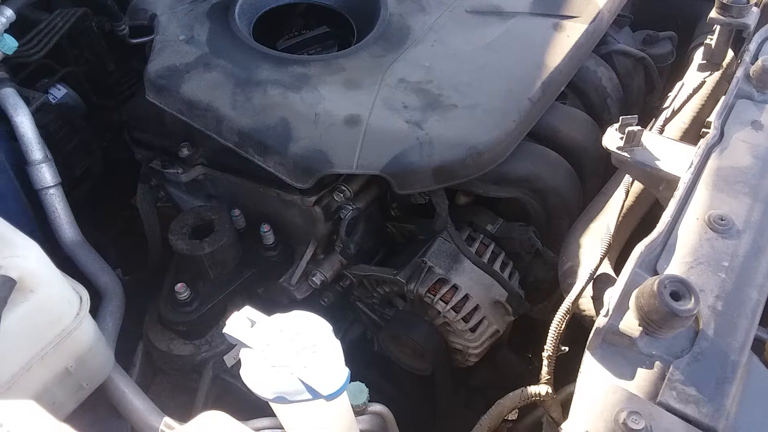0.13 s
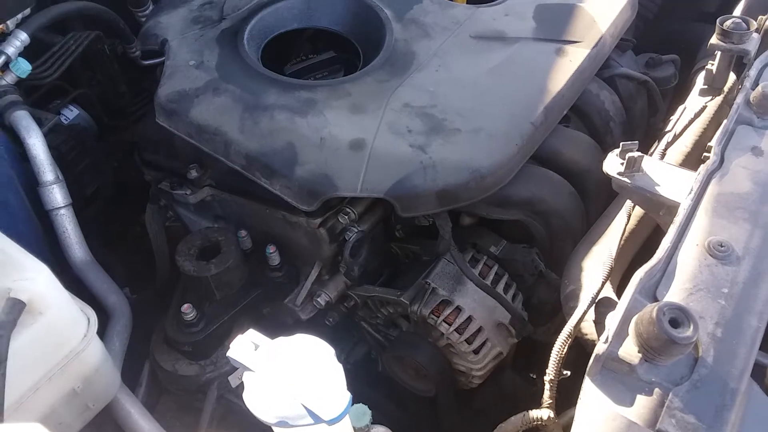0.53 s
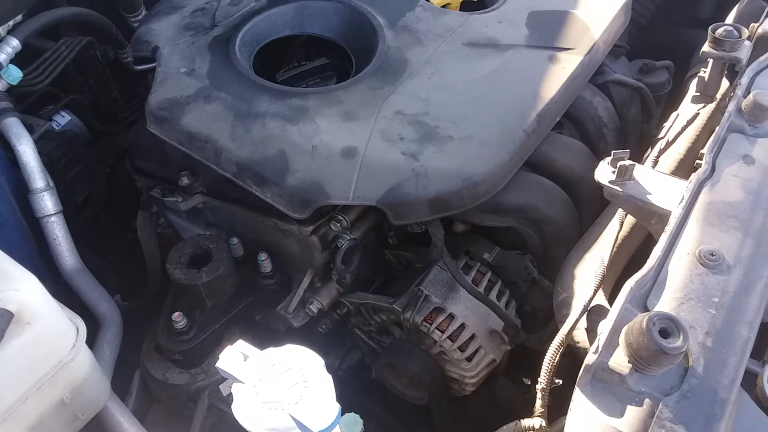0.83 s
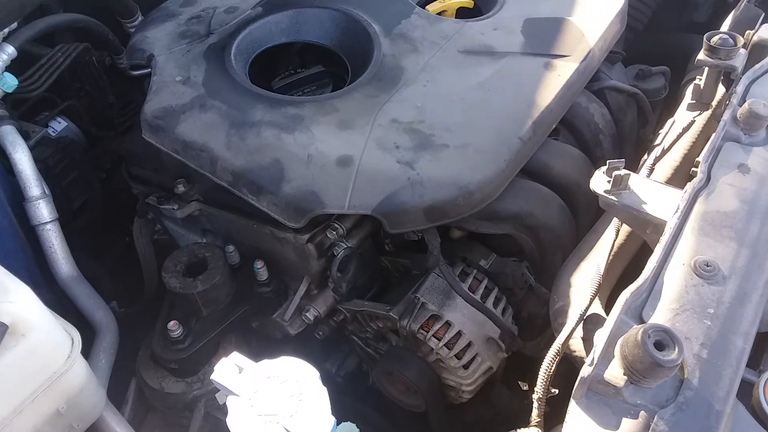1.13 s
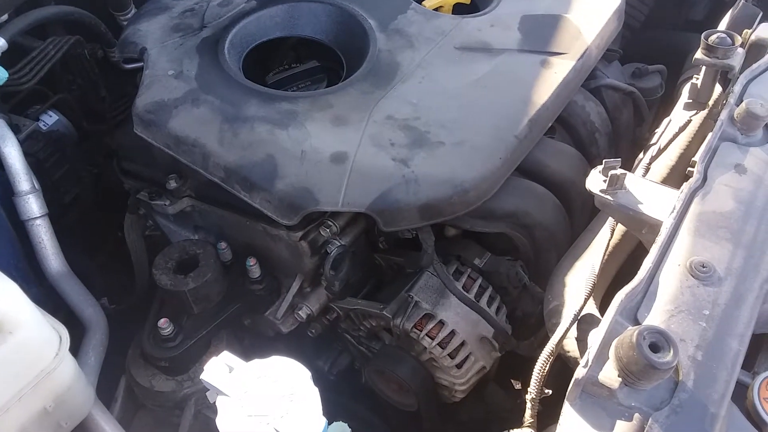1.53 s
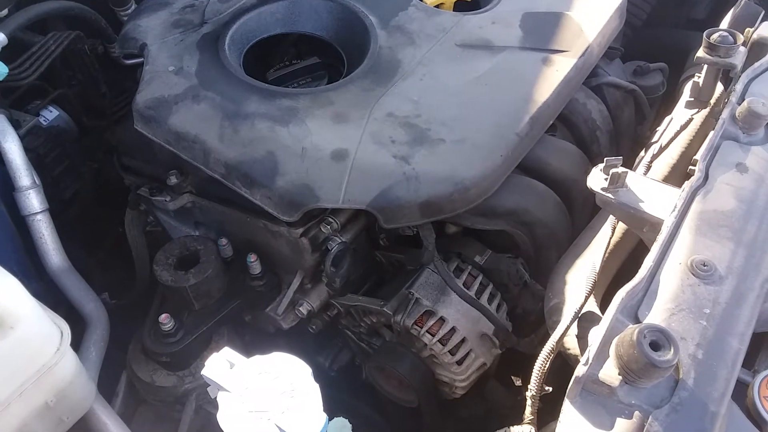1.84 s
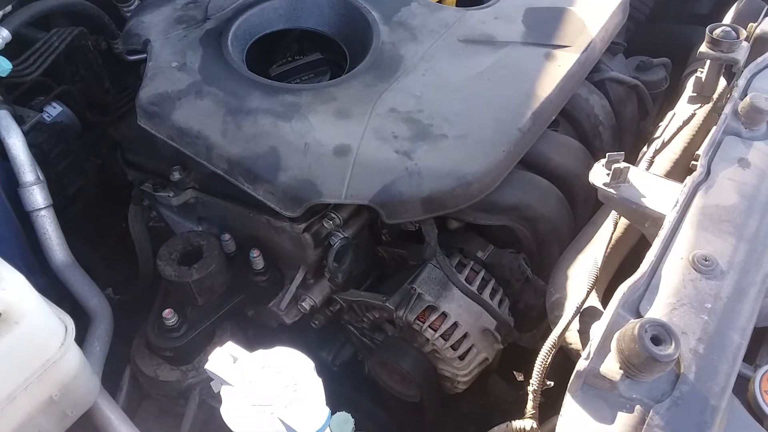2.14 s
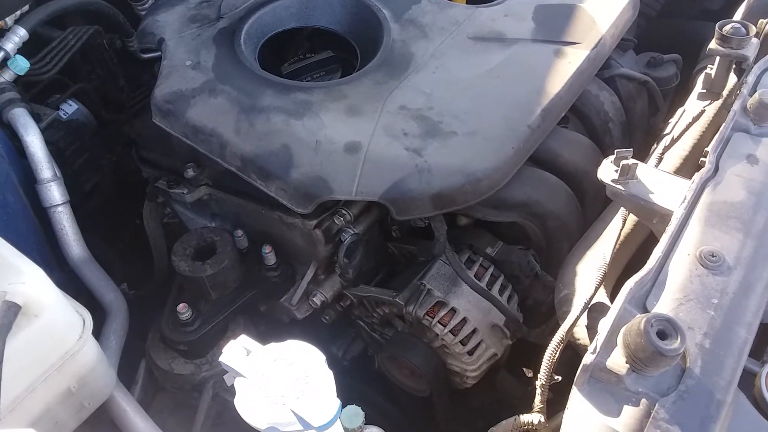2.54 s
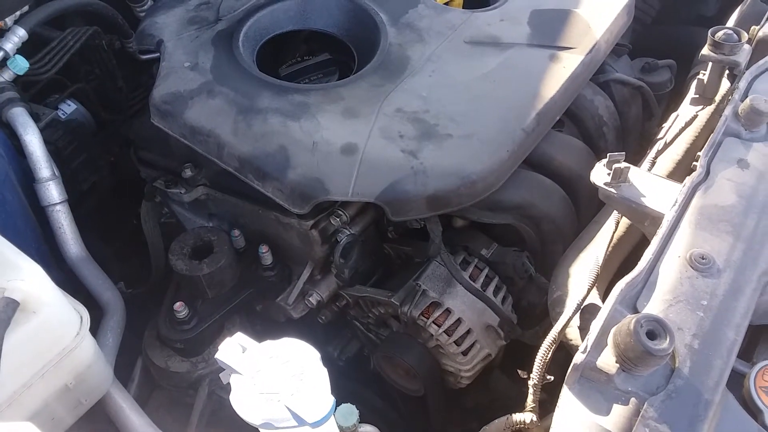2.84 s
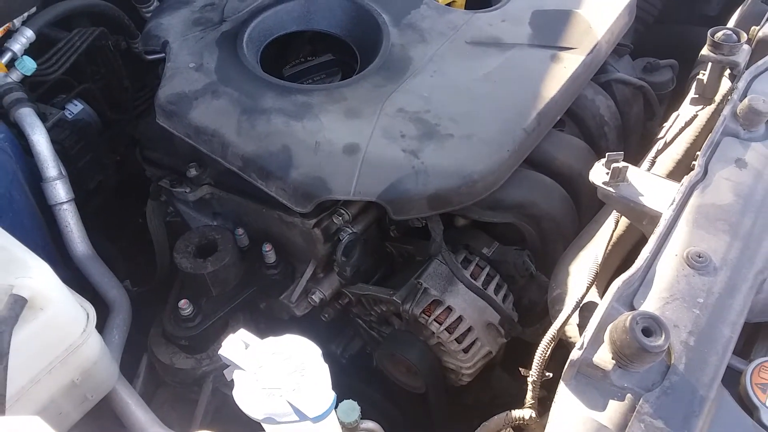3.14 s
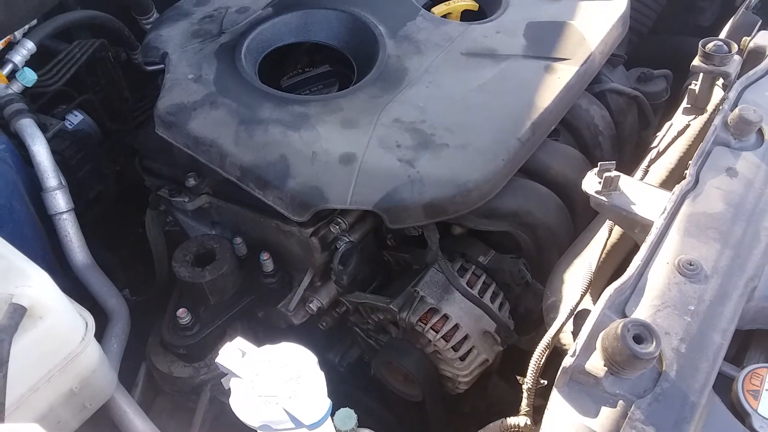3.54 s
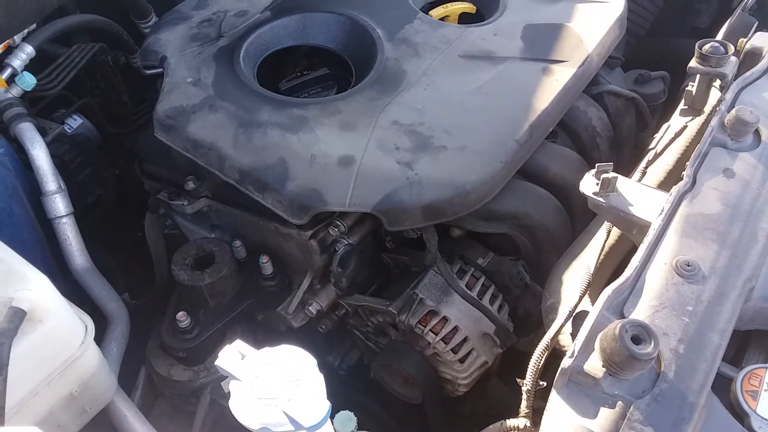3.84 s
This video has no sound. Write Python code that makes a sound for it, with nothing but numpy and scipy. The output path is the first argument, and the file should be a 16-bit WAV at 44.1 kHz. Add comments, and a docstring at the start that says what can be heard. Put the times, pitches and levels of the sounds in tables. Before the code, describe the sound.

After a short silence, a car engine fades in quickly and idles roughly, with fast, uneven hard knocks and bright rattles over hum and rumble, heard in stereo from just above the open bay outdoors.

```python
"""After a brief silence a four-cylinder engine fades in, idling with the bonnet open, from just above the bay.
Most firings knock in the block: impulses ring its damped modes and throw noise, a crack and a bright rattle.
Beneath them lie a hum, sines on multiples of twice the firing rate, and a rumble of coloured noise.
Two low thumps, decaying sines, come early on."""
import sys
import numpy as np
from scipy import signal
from scipy.fft import rfft, irfft
from scipy.io import wavfile

SR = 44100
rng = np.random.default_rng(int(sys.argv[2]) if len(sys.argv) > 2 else 0)


def persist_wave(psi):
    """Save psi, clipped to +-1, as 16-bit WAV."""
    counts = np.round(np.clip(psi, -1, 1) * 32767).astype(np.int16)
    wavfile.write(sys.argv[1], SR, np.atleast_2d(counts).T)


def volts_from_decibels(level):
    """Turn decibel levels (scalar or array-like) into linear amplitude factors."""
    exponent = np.asarray(level, float) / 20
    return 10 ** exponent


N = 176400

# Hum fundamental, twice the firing rate. Each row: time in seconds, frequency in Hz.
HUM_SPEED = [(.5, 63.75), (1.6, 65.37), (2.75, 66.36), (4, 66.8)]
# Fade-in of hum, rumble and faint knocks. Each row: time in seconds, gain in dB.
FADE_IN = [(.404, -62), (.412, -19), (.47, -7.5), (.62, 3.5), (.72, 5.5)]
SWELL_S = 0.0007   # rounding of each onset
LEFT_RIGHT = np.array([[1], [-1]])


def rms_one(x):
    """Normalisation: dividing by the root mean square gives unit power."""
    return x / np.sqrt(np.mean(x ** 2) + 1e-20)


def in_time(rows):
    """Linear interpolation of a (seconds, value) table at every sample."""
    return np.interp(np.arange(N) / SR, *np.transpose(rows))


def at_hz(points, hz):
    """Interpolation of a (Hz, value) table on a logarithmic frequency axis."""
    table_hz, values = np.transpose(points)
    return np.interp(np.log(hz), np.log(table_hz), values)


def drift(rate_hz):
    """Low-passed noise: two equal poles turn white noise into a slow random course of rms 1."""
    step = 40   # samples between computed points
    pole = np.exp(-2 * np.pi * step * rate_hz / SR)
    white = rng.standard_normal(N // step + 2002)
    slow = signal.lfilter([1], [1, -2 * pole, pole ** 2], white)[2000:]   # settled part
    return np.interp(np.arange(N) / step, np.arange(len(slow)), rms_one(slow))


def stereo_noise(spectrum, rings=(), more_alike=0):
    """Interaural coherence: a shared and an opposed noise mix to a set likeness in each band; rms 1."""
    # Each row: frequency in Hz, left-right correlation.
    likeness = [(60, 1), (400, 1), (900, 0.083), (2500, 0.81), (4500, 0.033), (15000, 0.12)]
    # Each row: frequency in Hz, left minus right in dB.
    leftness = [(60, 18.5), (290, -3), (640, -2), (1410, 8), (3100, -11), (6820, 3), (15000, 11)]
    cutoff_hz = 15890
    hz = np.maximum(np.arange(N // 2 + 1) * SR / N, 1)
    mid, side = rfft(rng.standard_normal((2, N)))
    alike = np.clip(at_hz(likeness, hz) + more_alike, 0, 1)
    gain = volts_from_decibels(at_hz(spectrum, hz))
    for ring_hz, width_hz, db in rings:
        gain = gain + volts_from_decibels(db) / (1 + (2 * (hz - ring_hz) / width_hz) ** 2)
    pan = (hz < cutoff_hz) * volts_from_decibels(at_hz(leftness, hz) / 2 * LEFT_RIGHT)
    both = np.sqrt(1 + alike) * mid + np.sqrt(1 - alike) * side * LEFT_RIGHT
    return rms_one(irfft(gain * pan * both, N))


def dying(s, db, t60_s):
    """Exponential decay: powers of overlapping blows add, each with a rounded onset."""
    blows = np.zeros(N)
    np.add.at(blows, (s * SR).astype(int), volts_from_decibels(2 * db))
    decay = volts_from_decibels(-120 / (t60_s * SR))   # of power
    soft = np.exp(-2 / (SWELL_S * SR))
    power = signal.lfilter([1], [1, -decay], blows + 1e-18)
    return np.sqrt(signal.lfilter([1 - soft], [1, -soft], power))


def firings():
    """Firing order: counting cycles between knocks places every firing; unlisted ones knock faintly."""
    # Knocks, fade included. Each row: time in seconds, knock level in dB.
    knocks = [(0.432, -23.5), (0.4955, -14.5), (0.5588, -11), (0.6206, -4.5), (0.6528, -7), (0.7469, -2),
              (0.7784, -4), (0.8083, -5.5), (0.8714, -2.5), (0.9036, -3), (0.994, -4.5), (1.028, -4),
              (1.0893, -7), (1.1203, -3), (1.1518, -7.5), (1.1821, -5), (1.243, -4), (1.367, -3.5),
              (1.3987, -3.5), (1.4585, -8), (1.4884, -3.5), (1.5499, -4.5), (1.5826, -5.5), (1.673, -2.5),
              (1.7058, -6), (1.7663, -7), (1.7965, -2.5), (1.8282, -3), (1.859, -14), (1.888, -11.5),
              (1.9178, -3), (1.9504, -7), (2.0387, -3.5), (2.0721, -7.5), (2.1016, -5.5), (2.1619, -2.5),
              (2.1938, -3), (2.2834, -3.5), (2.3136, -7.5), (2.345, -7), (2.4045, -2.5), (2.4368, -7),
              (2.4976, -14), (2.5257, -2.5), (2.557, -5), (2.6163, -9), (2.6463, -5), (2.6787, -4.5),
              (2.708, -7.5), (2.739, -10), (2.767, -3), (2.7981, -5.5), (2.8875, -3.5), (2.9177, -7.5),
              (2.9479, -4), (2.979, -5), (3.008, -10), (3.0384, -9), (3.0677, -5.5), (3.1285, -4.5),
              (3.157, -7), (3.1889, -4.5), (3.219, -8), (3.2489, -4.5), (3.3085, -5.5), (3.3369, -4.5),
              (3.3973, -7), (3.4265, -3.5), (3.4577, -4), (3.5175, -7.5), (3.5476, -4), (3.5767, -6.5),
              (3.638, -9), (3.6656, -4), (3.6979, -4.5), (3.7575, -10), (3.7875, -3.5), (3.8176, -5.5),
              (3.9051, -3), (3.9368, -5)]
    odd_at_s = 0.62   # an odd firing knocks here
    faint_db, faint_spread_db = -13, 2.0
    quiet_from_s, quiet_db = 1.6, -8   # the faint knocks weaken from here
    s, db = np.transpose(knocks)
    rate_hz = np.interp(s, *np.transpose(HUM_SPEED)) / 2
    count = np.cumsum(np.round(np.diff(s, prepend=s[0]) * rate_hz)).astype(int)
    every = np.arange(count[-1] + 3)
    beyond = np.maximum(every - count[-1], 0)   # firings after the last listed knock
    all_s = np.interp(every, count, s) + beyond * 2 / HUM_SPEED[-1][1]
    from_odd = every - count[np.argmin(abs(s - odd_at_s))]
    all_db = faint_db + faint_spread_db * rng.standard_normal(len(every))
    all_db += np.interp(all_s, *np.transpose(FADE_IN))
    all_db += quiet_db * (all_s > quiet_from_s)
    all_db[count] = db
    return all_s - SWELL_S, all_db, from_odd % 2


def block(s, db, even):
    """Modal synthesis: impulses excite damped modes, odd and even firings in different proportions."""
    # Modes of the block. Each row: frequency in Hz, decay time t60 in seconds, level from odd firings
    # and from even firings in dB re the knock, left minus right in dB.
    modes = [(989.3, 0.084, -18.5, -20, 6), (1131, 0.065, -20.5, -25, 12.5), (1314, 0.077, -8, -13, 1.5),
             (1563, 0.097, -35, -18.5, -1), (1638.5, 0.053, -10.5, -14.5, 4.5),
             (1685, 0.13, -19.5, -21, 12), (2033, 0.073, -25.5, -18, 23.5), (2115, 0.13, -21.5, -13, -9),
             (2205, 0.04, -13.5, -10, 17.5), (2525, 0.042, -23, -19, 25.5), (2943, 0.066, -45, -10, 11.5),
             (3422, .035, -17.5, -11.5, 5)]
    mode_spread_db, ear_spread_db, phase_spread_rad = 2.0, 1.0, 0.5
    detune = 0.015   # spread of a mode's pitch from knock to knock, as a share
    rebound_s, rebound_odd_db, rebound_even_db = 0.011, -4, -5   # the low modes are struck again
    rebound_under_hz = 1800
    chance = rng.standard_normal((len(s), len(modes), 5))
    at = (s * SR).astype(int)
    again = np.minimum((s + rebound_s) * SR, N - 1).astype(int)
    latest = np.maximum(np.searchsorted(at, np.arange(N), "right") - 1, 0)   # knock now sounding
    rebound_gain = volts_from_decibels(np.where(even, rebound_even_db, rebound_odd_db))
    soft = np.exp(-1 / (SWELL_S * SR))
    out = np.zeros((2, N))
    for k, (hz, t60_s, odd_db, even_db, left_db) in enumerate(modes):
        blows = np.zeros((2, N), complex)
        level_db = db + np.where(even, even_db, odd_db) + mode_spread_db * chance[:, k, 0]
        phase = np.exp(1j * phase_spread_rad * chance[:, k, 3])
        rebound = (hz < rebound_under_hz) * rebound_gain * np.exp(1j * chance[:, k, 3])
        for ear in range(2):
            blow = volts_from_decibels(level_db + ear_spread_db * chance[:, k, 1 + ear]) * phase
            blows[ear, at] += blow
            blows[ear, again] += blow * rebound
        mode_hz = hz * (1 + detune * chance[latest, k, -1])
        spin = np.exp(2j * np.pi * np.cumsum(mode_hz) / SR)
        poles = np.convolve([1, -volts_from_decibels(-60 / (t60_s * SR))], [1, -soft])
        # the envelope is filtered at rest, then spun back up to the mode's pitch
        ring = signal.lfilter([1 - soft], poles, blows / spin + 1e-18) * spin
        out += ring.imag * volts_from_decibels(left_db / 2 * LEFT_RIGHT)
    return out


def bursts(s, db, even):
    """Noise bursts: knocks gate a broad crack and a treble rattle, a snap on a longer tail."""
    # The clearest treble rattles. Each row: time in seconds, rattle level in dB.
    rattles = [(0.494, -35), (0.619, -26), (0.7446, -22.5), (0.8693, -26), (0.934, -25), (1.1186, -25),
               (1.2733, -26), (1.3654, -27.5), (1.518, -24), (1.7947, -23), (1.9166, -25), (2.0397, -30),
               (2.07, -28), (2.2835, -29), (2.313, -24), (2.887, -29), (2.916, -24), (2.976, -25),
               (3.006, -48), (3.1262, -29), (3.186, -28.5), (3.2464, -28), (3.306, -30), (3.4262, -24),
               (3.575, -28), (3.696, -31), (3.665, -25), (3.7847, -34), (3.815, -30.5), (3.904, -27),
               (3.935, -31)]
    # Spectrum of the crack. Each row: frequency in Hz, relative density in dB per Hz.
    crack_spectrum = [(500, -26), (900, -6.5), (2100, 1), (3300, -12.5), (5500, -18.5), (8000, -103)]
    # Spectrum of the rattle. Each row: frequency in Hz, relative density in dB per Hz.
    rattle_spectrum = [(2350, -59), (4000, -8), (5670, -0.5), (7600, 2.5), (8520, -9), (12200, -10),
                       (15700, -14.5)]
    # Resonance of the rattle. Each row: frequency in Hz, width in Hz, relative level in dB.
    rattle_rings = [(6920, 180, 1.5)]
    odd_rattle_db, even_rattle_db = -23, -48   # every knock rattles a little, re its level
    crack_db, crack_t60_s = -9, 0.08
    crack_alike = 0.043   # likeness added for so near a source
    tail_db, tail_t60_s, snap_db, snap_t60_s = -3.5, 0.22, 1.5, 0.032
    crack = dying(s, db + crack_db, crack_t60_s) * stereo_noise(crack_spectrum, more_alike=crack_alike)
    small_db = db + np.where(even, even_rattle_db, odd_rattle_db)
    all_s, all_db = np.hstack([np.transpose(rattles), [s, small_db]])
    tail = dying(all_s, all_db + tail_db, tail_t60_s)
    snap = dying(all_s, all_db + snap_db, snap_t60_s)
    return crack + (tail + snap) * stereo_noise(rattle_spectrum, rattle_rings)


def thumps():
    """Damped oscillation: a low sine starts from zero and dies exponentially."""
    # Each row: start in seconds, starting level of the envelope in dB.
    blows = np.array([(0.621, -30), (0.744, -29)])
    pitch_hz, t60_s = 72, 0.1
    t = np.maximum(np.arange(N) / SR - blows[:, :1], 0)
    envelope = volts_from_decibels(blows[:, 1:] - 60 * t / t60_s)
    return np.sum(envelope * np.sin(2 * np.pi * pitch_hz * t), axis=0)


def hum():
    """Additive synthesis: sines on multiples of twice the firing rate waver in level and phase."""
    # Each row: multiple of the fundamental (quarters are turns of the crank), rms level in dB
    # once fully grown, before the waver and the fade.
    partials = [(1, -49), (1.75, -57.5), (2, -52), (3, -50), (4, -53.5), (5, -37.5), (5.5, -54.5),
                (7.5, -50), (8, -45), (10, -44), (20, -47)]
    waver_db, waver_rad = 0.59, 0.15
    apart_rad = 0.061   # left leads and right trails by this in the lowest multiples
    grows_db_per_s, full_s = 3.0, 3.27   # every fifth multiple grows until then
    phase = 2 * np.pi * np.cumsum(in_time(HUM_SPEED)) / SR
    grows_db = grows_db_per_s * np.minimum(np.arange(N) / SR - full_s, 0)
    out = 0
    for k, db in partials:
        turn = 2 * np.pi * rng.random() + apart_rad * LEFT_RIGHT * (k < 3)
        turn = turn + waver_rad * np.array([drift(14.0), drift(3.2)])   # left, right
        level_db = db + waver_db * np.sqrt(k) * drift(7.5) + grows_db * (k % 5 == 0)
        out = out + np.sqrt(2) * volts_from_decibels(level_db) * np.sin(k * phase + turn)
    return out


def rumble():
    """Filtered noise: a coloured stereo bed whose top is amplitude-modulated, so the treble flickers."""
    # Each row: frequency in Hz, relative density in dB per Hz.
    spectrum = [(20, -55), (90, -15), (240, -15), (500, -8), (850, -11), (2140, -5), (5600, -22),
                (8500, -31.5), (12000, -30), (16000, -28.5)]
    level_db = -28   # rms before flicker and fade
    flicker_db, flicker_over_hz = 3.5, 9900
    bed = volts_from_decibels(level_db) * stereo_noise(spectrum)
    high_pass = signal.butter(2, flicker_over_hz, "high", fs=SR, output="sos")
    top = signal.sosfiltfilt(high_pass, bed)
    return bed - top + top * volts_from_decibels(flicker_db * drift(35.0))


def lag_right(x):
    """Interaural time difference: a phase slope delays the right channel, less in the bass."""
    bass_lag_s, upper_lag_s, split_hz = 0.00019, 0.000451, 850
    hz = np.arange(N // 2 + 1) * SR / N
    turn = np.exp(-2j * np.pi * hz * np.where(hz < split_hz, bass_lag_s, upper_lag_s))
    return np.array([x[0], irfft(rfft(x[1]) * turn, N)])


def scene():
    """Superposition: block, bursts and thumps add to the faded hum and rumble, after an initial silence."""
    steady = volts_from_decibels(in_time(FADE_IN)) * (rumble() + hum())
    s, db, even = firings()
    mix = steady + block(s, db, even) + bursts(s, db, even) + thumps()
    return lag_right(mix) * (np.arange(N) > FADE_IN[0][0] * SR)


def top_cut(x):
    """Nothing passes above the cut-off."""
    return signal.sosfilt(signal.butter(12, 15890, fs=SR, output="sos"), x)


def record(dry):
    """Soft saturation: a hyperbolic tangent rounds the peaks towards a ceiling."""
    ceiling = 1.3
    mix = ceiling * np.tanh(dry / ceiling)
    return top_cut(mix)


dry = scene()
out = record(dry)
persist_wave(out)
```